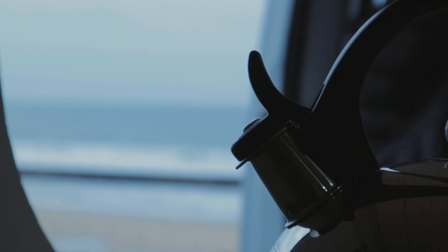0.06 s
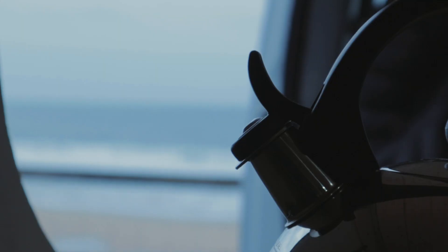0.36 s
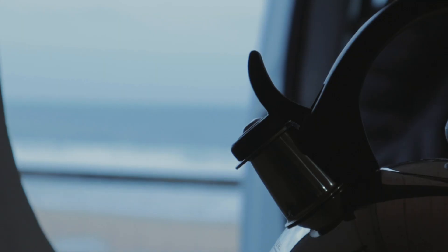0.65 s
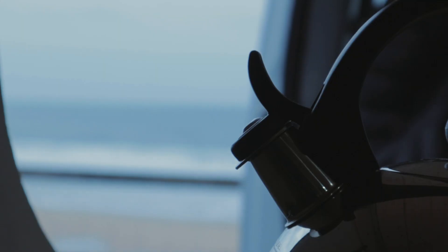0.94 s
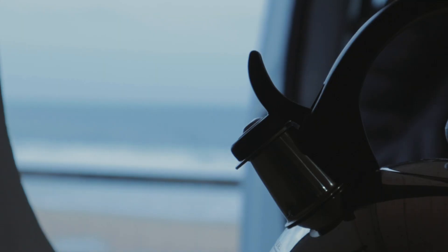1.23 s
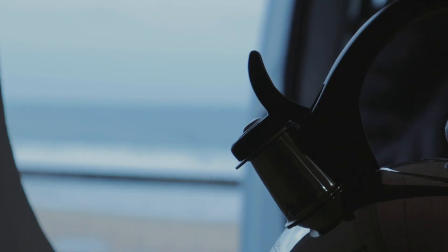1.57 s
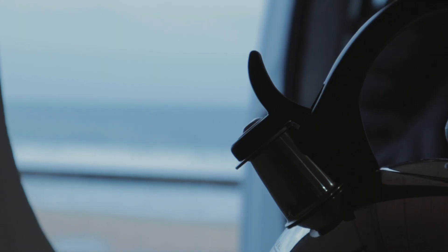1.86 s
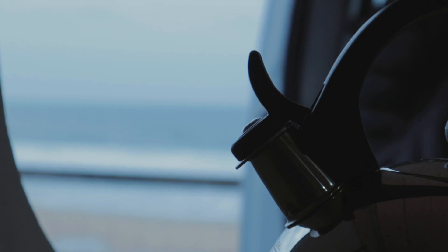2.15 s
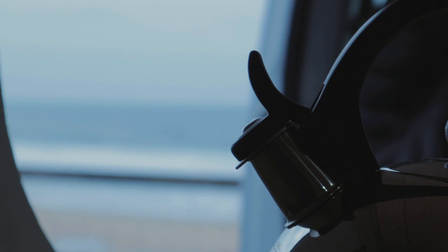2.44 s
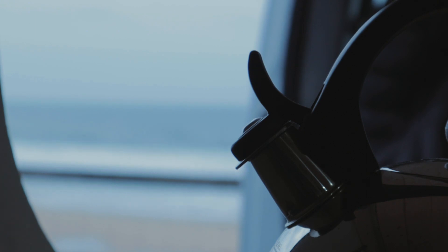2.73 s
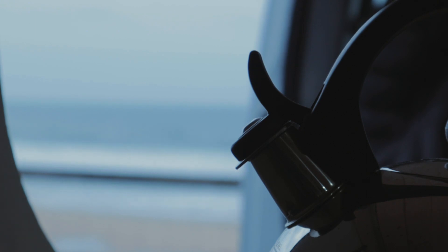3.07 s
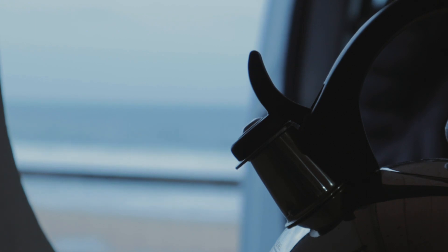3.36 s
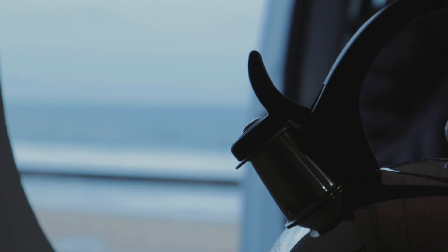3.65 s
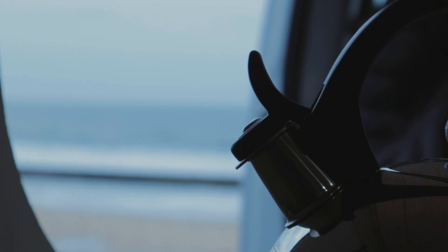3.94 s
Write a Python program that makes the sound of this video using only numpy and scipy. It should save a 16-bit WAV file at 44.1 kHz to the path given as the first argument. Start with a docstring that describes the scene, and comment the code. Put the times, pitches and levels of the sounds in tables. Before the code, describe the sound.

A boiling kettle whistles continuously in the close space of a small van. Its wavering pitch steps up early and becomes a harsh cluster of tones, with hissing steam and a faint rush of burner and sea underneath.

```python
"""A kettle whistling in a small van by the sea

The kettle's steam jet flutters in pitch and jumps to a higher note, where a second, lower tone joins in.
The two mix into a shrill cluster of extra tones, at the sums and differences of their pitches.
Steam hisses along, the van's close walls echo it all, and sea and burner make a faint low rush."""
import sys
import numpy as np
from scipy import signal
from scipy.fft import rfft, irfft
from scipy.io import wavfile

SR = 44100
rng = np.random.default_rng(int(sys.argv[2]) if len(sys.argv) > 2 else 0)


def unload_audio(sound):
    """Save the sound as a 16-bit wav file, at the path given as the first command line argument."""
    columns = np.transpose(np.atleast_2d(sound))
    # keep every value between -1 and 1, then stretch to whole-number steps
    steps = np.round(np.clip(columns, -1, 1) * 32767)
    wavfile.write(sys.argv[1], SR, steps.astype(np.int16))


N = 176400  # 4 seconds

# The low rush of sea and burner. Each row: frequency in Hz, relative level in dB.
RUSH_SPECTRUM = [(30, -5), (44, -7), (80, -2.5), (100, -3), (146, -3.5), (200, -1), (275, -4), (373, -.5),
                 (440, -2), (536, -1.5), (728, -4), (1230, -11), (2000, -14), (6000, -31), (15000, -32)]
# How alike the rush is in both ears. Each row: frequency in Hz, likeness (1 is identical).
RUSH_LIKENESS = [(60, .99), (170, .98), (350, .9), (700, .87), (1200, .96), (1700, .999)]
# Which way the rush leans. Each row: frequency in Hz, left minus right in dB.
RUSH_LEAN = [(150, 0.43), (350, -1.6), (700, -2.7), (1400, 0)]
# Faint low hums. Each row: frequency in Hz, width in Hz, level in dB.
HUMS = [(151, 5, -63), (207, 9, -66)]
# The colour of the steam hiss. Each row: frequency in Hz, relative level in dB.
HISS_SPECTRUM = [(900, -35), (1600, -16.5), (1900, -14.5), (2300, 1.5), (2700, -9), (3150, -4.5),
                 (3450, -11), (4200, -1), (5100, -2), (5900, 6.5), (6900, 0.5), (7900, 4), (8800, -13.5),
                 (9400, -33), (10500, -7.5), (12000, -12), (15500, -26)]
# How loud the hiss is. Each row: time in seconds, base level in dB.
HISS_LEVEL = [(0, -43), (.25, -49), (.32, -39.5), (1, -41), (2.3, -37.5), (2.5, -38.5), (4, -39)]
# How far the jet flutters. Each row: time in seconds, typical pitch swing in Hz.
FLUTTER_DEPTH = [(0, 115), (.25, 110), (.28, 45), (.35, 165), (.7, 140), (1.1, 105), (1.5, 110), (2, 125),
                 (2.5, 150), (2.65, 80), (3, 160), (3.5, 150), (3.75, 115), (4, 145)]
# Spurts (up) and falters (down) of the steam. Each row: time in seconds, push on the pitch in Hz.
SPURTS = [(0.017, 392), (0.107, -266), (0.162, 362.5), (0.179, 426), (0.225, -290), (0.258, 384),
          (0.338, 352.5), (0.375, -356), (0.422, 313), (0.506, -376), (0.561, 406), (0.608, -298),
          (0.645, -341), (0.679, 444), (0.718, -275), (0.761, -296), (0.807, 313), (0.926, 317),
          (1.022, 327), (1.13, 348), (1.19, 344), (1.322, 334), (1.471, 316), (1.586, 503), (1.619, 431),
          (1.678, 500), (1.935, 507.5), (2.013, 386.5), (2.089, 471), (2.251, 385), (2.527, 320.5),
          (2.572, 514.5), (2.764, 325.5), (2.914, 400.5), (2.937, 322.5), (2.986, 333), (3.007, 495),
          (3.053, 348), (3.104, 344), (3.16, 414), (3.245, 545.5), (3.321, 347.5), (3.588, 332),
          (3.805, 338), (3.845, 336), (3.869, 451)]
# The main note. Each row: time in seconds, pitch in Hz.
MAIN_PITCH = [(0, 3090), (.18, 3120), (.266, 2960), (.277, 3740), (.55, 3860), (1, 4030), (1.5, 4045),
              (2, 4105), (2.48, 4205), (2.6, 4350), (2.68, 4335), (2.9, 4235), (3.6, 4205), (4, 4300)]
# The main note and its overtones at 2 and 3 times the pitch. Each row: time in seconds, base level in dB.
MAIN_LEVEL = [(0, -32), (.17, -34), (.23, -37), (.3, -33.5), (.45, -33), (.75, -31.5), (.9, -29),
              (1.3, -31.5), (1.6, -32), (2.3, -32), (2.5, -32.5), (2.57, -27), (2.66, -30.5), (3.1, -32),
              (3.5, -31.5), (4, -29.5)]
OCTAVE_LEVEL = [(0, -36.5), (.26, -36.5), (.3, -35), (.37, -39.5), (.8, -36.5), (1.35, -36.5),
                (1.55, -38.5), (2.3, -39), (2.62, -35), (3, -37.5), (3.5, -36.5), (4, -37.5)]
THIRD_LEVEL = [(0, -57.5), (.26, -55.5), (.3, -54), (.36, -63), (2.4, -68), (2.65, -55), (2.9, -62),
               (4, -60)]
# The lower tone coming and going. Each row: time in seconds, relative strength in dB.
LOWER_STRENGTH = [(0, -28), (.265, -37), (.285, -7), (.33, -9.5), (.37, -11.5), (.7, -6.5), (1.1, -2),
                  (1.46, -1), (1.6, -5.5), (1.87, -1.5), (2.28, -3.5), (2.5, 0.5), (2.62, -6), (2.635, -11),
                  (2.68, -13), (2.71, -0.5), (2.83, -6), (3, -1.5), (3.25, -3), (3.45, 0), (4, -2.5)]
# The lower tone and its mixes. Each row: multiple of the main pitch, multiple of the lower pitch to add.
MIXES = [(0, 1), (1, 1), (1, -1), (2, -1), (2, 1), (2, -2), (0, 2), (3, -2), (1, 2), (3, -1), (3, -3),
         (3, 1)]
# Each entry: base level in dB of the matching row above.
MIX_LEVELS = [-37, -30.5, -51.5, -39, -47.5, -53, -51, -45.5, -68.5, -54, -77, -67]

SHIMMER_RATE_HZ = 140  # speed of the flicker in loudness
TIME, FREQS = np.arange(N) / SR, np.fft.rfftfreq(N, 1 / SR)


def amp(db):
    """Turn decibels into a gain."""
    return 10 ** (np.asarray(db) / 20)


def over_time(points):
    """Join a table's points into a curve over time."""
    return np.interp(TIME, *np.transpose(points))


def over_frequency(points):
    """Join a table's points into a curve over log frequency."""
    hz, value = np.transpose(points)
    return np.interp(np.log(FREQS + 1), np.log(hz + 1), value)


def noise(spectrum):
    """Noise of typical size 1 with the given spectrum."""
    x = irfft(rfft(rng.standard_normal(N)) * spectrum, N)
    return x / (x.std() + 1e-20)


def wobble(rate_hz):
    """Random motion up to about this rate."""
    return noise(1 / np.sqrt(1 + (FREQS / rate_hz) ** 4))


def band(hz, width_hz):
    """Noise in one narrow band."""
    return noise(np.exp(-.5 * ((FREQS - hz) / width_hz) ** 2))


def sea_and_burner(low_cut_hz=40, wave_at_s=2.936, wave_width_s=.15):
    """A steady low rush in stereo, with faint hums and one distant wave swelling."""
    spectrum = amp(over_frequency(RUSH_SPECTRUM)) * FREQS ** 4 / (FREQS ** 4 + low_cut_hz ** 4)
    likeness = over_frequency(RUSH_LIKENESS)
    shared = rfft(noise(spectrum)) * np.sqrt((1 + likeness) / 2)
    side = rfft(noise(spectrum)) * np.sqrt((1 - likeness) / 2)
    lean = amp(over_frequency(RUSH_LEAN) / 2)
    rush = irfft(np.array([(shared + side) * lean, (shared - side) / lean]), N)
    wave = band(hz=618, width_hz=190) * np.exp(-.5 * ((TIME - wave_at_s) / wave_width_s) ** 2)
    hums = sum(amp(db) * band(hz, width) for hz, width, db in HUMS)
    return amp(-49.5) * (rush + wave) + hums


def van_walls(sound, echo_db=-15, fade_s=.1):
    """Close walls add a short patter of echoes."""
    t = TIME[:SR // 5]
    echoes = rng.standard_normal(len(t)) * (rng.random(len(t)) < .05)
    echoes *= (t > .002) * amp(-60 * t / fade_s)
    return sound + amp(echo_db) * signal.fftconvolve(sound, echoes / np.linalg.norm(echoes))[:N]


def steam_hiss(lower_db):
    """Steam hisses, thinning whenever the lower tone stalls, and the spout rings faintly."""
    level_db = over_time(HISS_LEVEL) + .4 * np.maximum(lower_db, -17.5)
    hiss = noise(amp(over_frequency(HISS_SPECTRUM))) * amp(level_db)
    spout_ring = amp(-59.5) * band(hz=3190, width_hz=80)
    return hiss + spout_ring


def jet_flutter(rate_hz=45, spread_octaves=.42):
    """The jet's flutter in Hz: quick rises, sharp crests and slower falls."""
    spectrum = np.exp(-.5 * (np.log2((FREQS + 1) / rate_hz) / spread_octaves) ** 2)
    flutter = signal.hilbert(noise(spectrum))  # gives each cycle's size and angle
    size, angle = 2 * np.tanh(abs(flutter) / 2), np.angle(flutter)
    crests = np.cos(angle) + .16 * np.cos(2 * angle) - .17 * np.sin(2 * angle)
    return over_time(FLUTTER_DEPTH) * size * crests


def steam_jet(wander_hz=32, jitter_hz=36, lull_hz=-150, rise_s=.004, fall_s=.0075):
    """The unsteady jet: returns its pitch swing in Hz and a lift of about 1 dB at each spurt."""
    swing = jet_flutter() + wander_hz * wobble(rate_hz=22)
    lift_db = np.zeros(N)
    for at_s, push_hz in SPURTS:
        since, is_spurt = TIME - at_s, push_hz > 0
        lull = np.exp(-((since + .01) / .005) ** 2) * is_spurt  # the pitch dips just before a spurt
        swing += lull * (lull_hz - swing)
        rising = (since < 0) == is_spurt
        bump = np.exp(-(since / np.where(rising, rise_s, fall_s)) ** 2)
        swing += bump * (push_hz - swing)
        lift_db += bump * is_spurt
    return swing + jitter_hz * wobble(rate_hz=280), lift_db


def tone(phase, db, rough, rough_hz=380):
    """One tone, roughened by the swirling steam."""
    pure = np.exp(1j * (phase + 2 * np.pi * rng.random()))
    swirl = (wobble(rough_hz) + 1j * wobble(rough_hz)) / np.sqrt(2)
    return np.sqrt(2) * amp(db) * (pure * (1 + rough * swirl)).real


def whistle(lower_db, main_boil_hz=4220, lower_boil_hz=2328, drift_hz=14.18):
    """Two tones ride the same steam jet and mix into sums and differences."""
    swing, lift_db = steam_jet()
    main_hz = over_time(MAIN_PITCH) + swing
    lower_hz = lower_boil_hz + .45 * (main_hz - main_boil_hz) + drift_hz * wobble(rate_hz=90.6)
    main_phase, lower_phase = 2 * np.pi * np.cumsum([main_hz, lower_hz], axis=1) / SR
    # For the first 1.3 seconds, the whistle weakens when its pitch swings down.
    sag_db = -15 * np.clip(-swing / 260, 0, 1) ** 2 * np.clip(1 - TIME / 1.3, 0, 1)
    main_db = over_time(MAIN_LEVEL) + sag_db + lift_db + 1.74 * wobble(SHIMMER_RATE_HZ)
    sound = tone(main_phase, main_db, rough=.1)
    octave_db = over_time(OCTAVE_LEVEL) + sag_db / 2 + 1.77 * wobble(SHIMMER_RATE_HZ)
    sound += tone(2 * main_phase, octave_db, rough=.22)
    sound += tone(3 * main_phase, over_time(THIRD_LEVEL) + lift_db, rough=.22)
    # A faint tone an octave below fades out just before the jump.
    fade = np.sqrt(np.clip(1 - TIME / .22, 0, 1))
    sound += tone(main_phase / 2, -55 + sag_db, rough=.17) * fade
    for (m, n), base_db in zip(MIXES, MIX_LEVELS):
        mix_db = base_db + sag_db + np.sqrt(abs(n)) * lower_db
        sound += tone(m * main_phase + n * lower_phase, mix_db, rough=.17 * (m + abs(n)) / 2)
    return sound


def scene():
    """The kettle in the centre, with sea and burner around it."""
    lower_db = over_time(LOWER_STRENGTH) + 1.71 * wobble(SHIMMER_RATE_HZ)
    lower_db -= 9 * np.maximum(wobble(rate_hz=40) - .5, 0)  # the lower tone stalls now and then
    kettle = whistle(lower_db) + steam_hiss(lower_db)
    return van_walls(kettle) + sea_and_burner()


def record(dry):
    """Cut the very highest treble, above 15720 Hz."""
    low_pass = signal.firwin(511, 15720, window=("kaiser", 9), fs=SR)
    return signal.oaconvolve(dry, low_pass[None], "same")


dry = scene()
out = record(dry)
unload_audio(out)
```